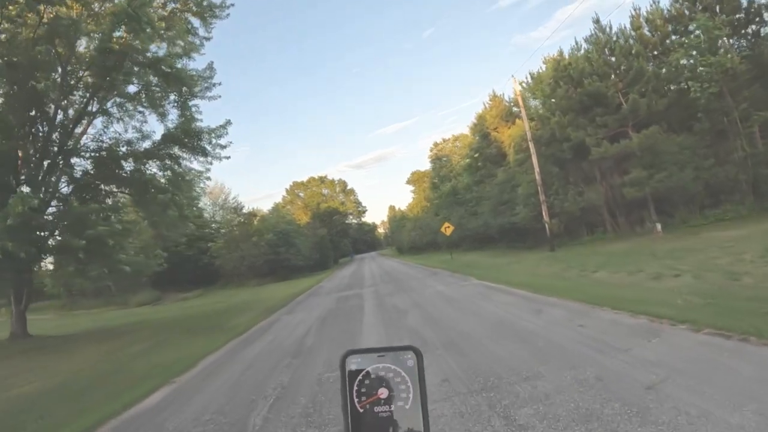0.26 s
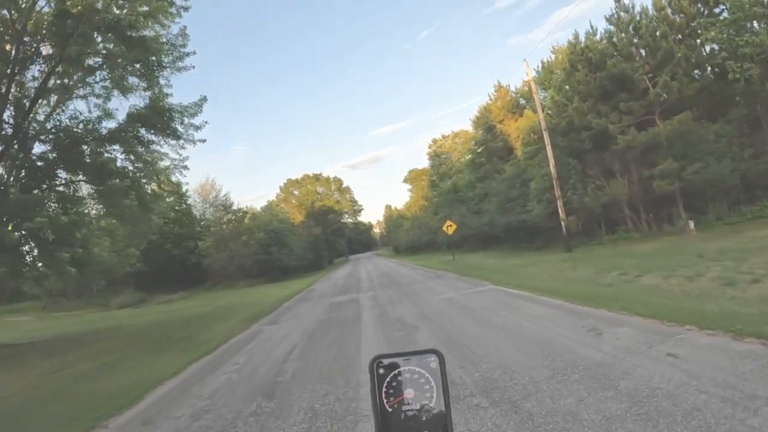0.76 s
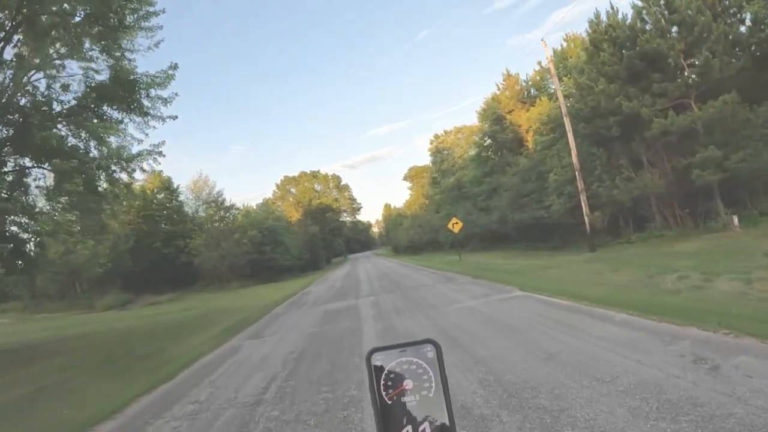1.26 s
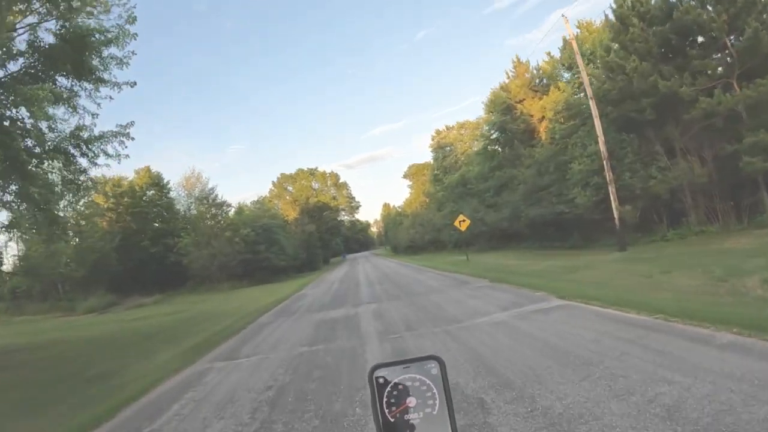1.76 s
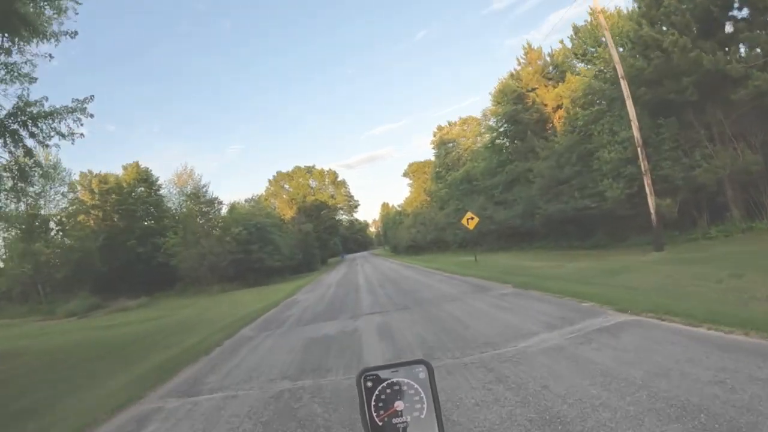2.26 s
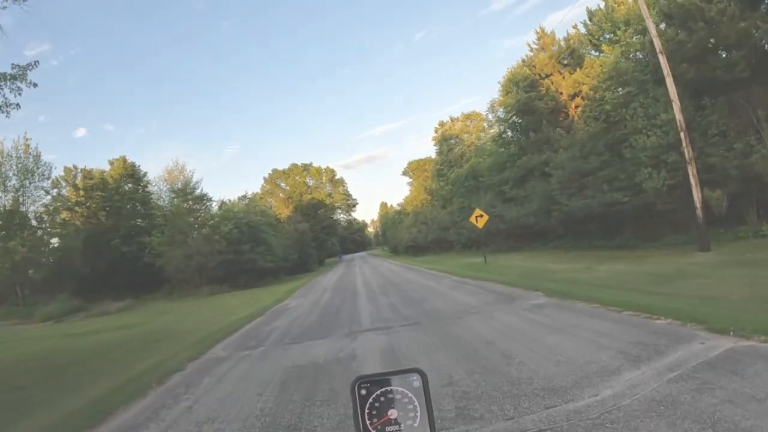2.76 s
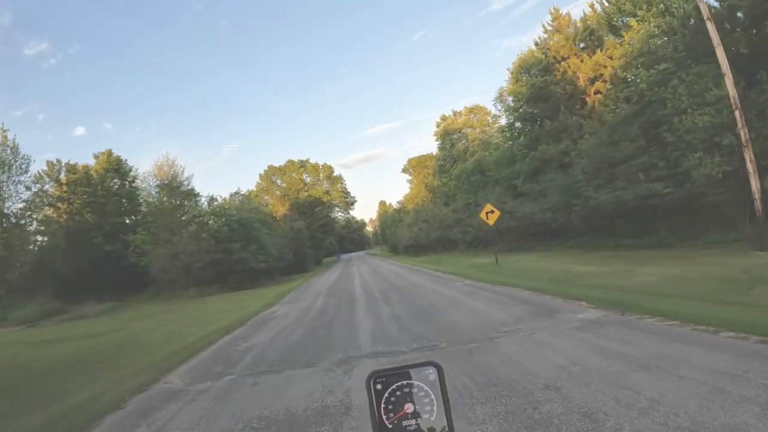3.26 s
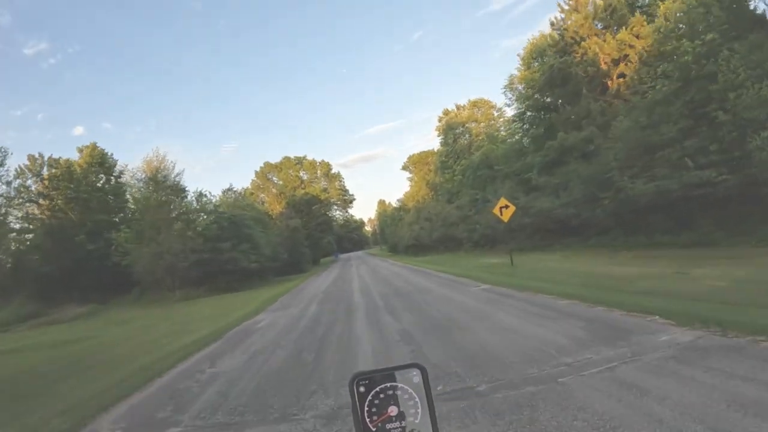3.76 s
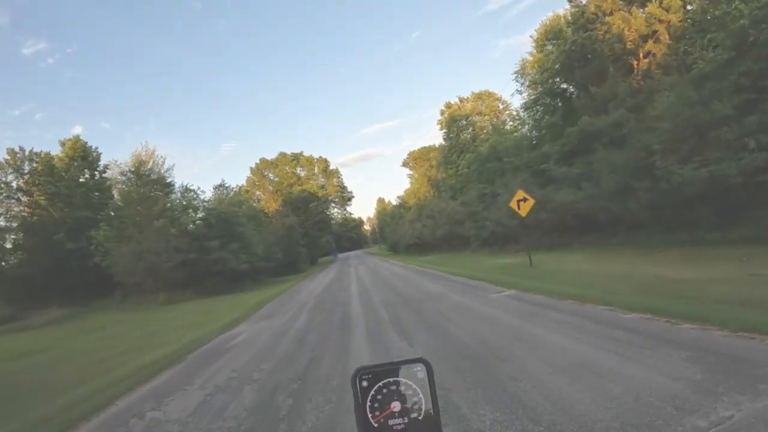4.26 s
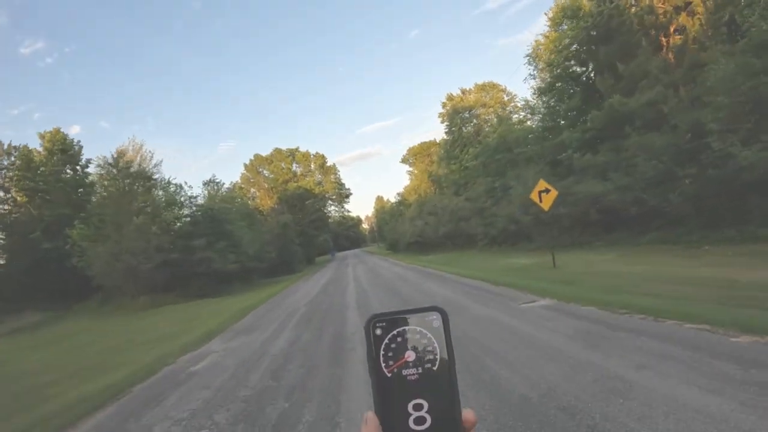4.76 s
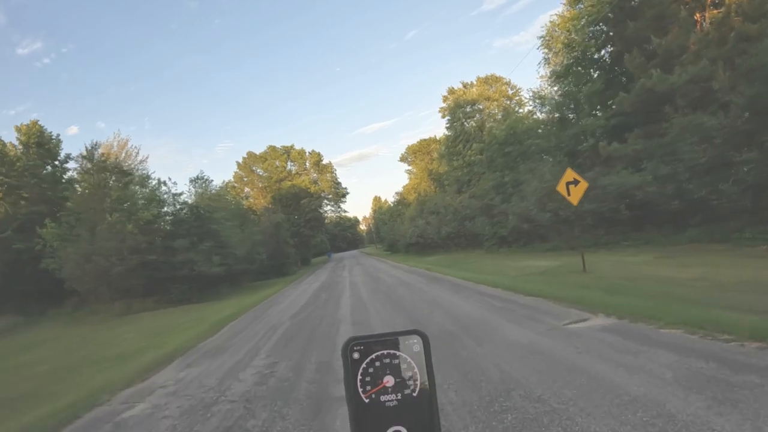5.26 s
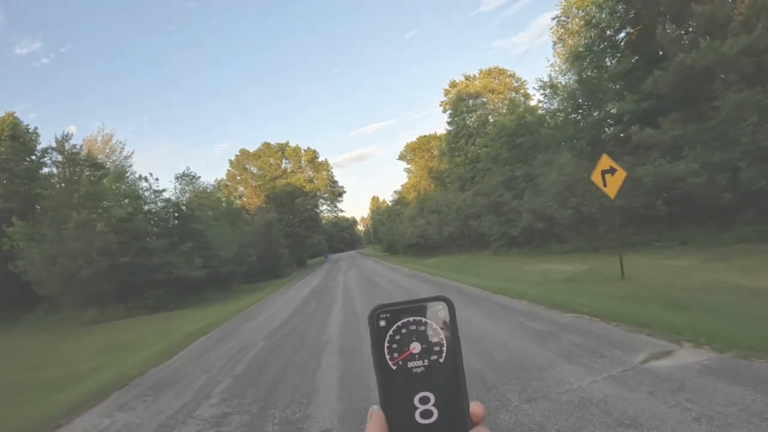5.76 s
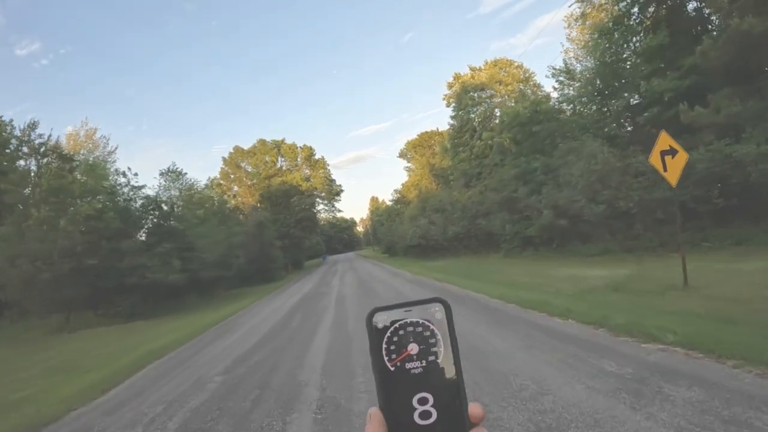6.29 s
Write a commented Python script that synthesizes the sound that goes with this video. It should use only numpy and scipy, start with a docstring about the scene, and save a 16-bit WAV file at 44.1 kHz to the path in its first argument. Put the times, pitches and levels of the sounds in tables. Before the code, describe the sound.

A small electric scooter's steady mid-pitched motor and chain whine over rumbling coarse asphalt, with cracks knocking and wind buffeting the microphone.

```python
"""Electric scooter, rider's place

Open country in the evening, microphone riding with the scooter along a paved road.
Close by, chain teeth meshing on the motor sprocket whine as sine lines, and roller ticks ring the frame.
Below, filtered noise makes the tyres roar on coarse asphalt; cracks knock as short falling tones.
Wind buffets the microphone as low noise in gusts; insects by the roadside are faint, narrow noise."""
import sys
import numpy as np
from scipy import signal
from scipy.fft import rfft, irfft
from scipy.io import wavfile
from scipy.ndimage import uniform_filter1d

SR = 44100
rng = np.random.default_rng(int(sys.argv[2]) if len(sys.argv) > 2 else 0)


def output_pcm(signal):
    """Save a mono or channel-first signal as 16-bit PCM at the path in sys.argv[1].

    Samples are clipped to [-1, 1] before scaling.
    """
    pcm = np.clip(np.atleast_2d(signal).T, -1, 1) * 32767
    wavfile.write(sys.argv[1], SR, np.round(pcm).astype(np.int16))


N = 287973
TIME = np.arange(N) / SR

# insects in the verge, loudest as the scooter passes them, before a 1 dB lift: (time [s], level [dB])
HISS_LEVEL = [(0, -85), (1.15, -77), (1.4, -69), (3.33, -68), (3.43, -74), (4.6, -75), (4.82, -70),
              (4.9, -86), (6.53, -88)]
# spectrum of those insects: (frequency [Hz], relative level per Hz [dB])
HISS_COLOUR = [(7000, -50), (9500, -23.5), (10500, -14.5), (11500, -10.5), (12300, -3.5), (13000, -1),
               (13900, -12.5), (15000, -16.5), (18000, -49)]

# steady airflow over the microphone: (time [s], level [dB])
AIRFLOW_LEVEL = [(0, -28.5), (.7, -25.5), (1.15, -32.5), (2.5, -40), (3.5, -29), (4.5, -27.5), (4.95, -33),
                 (5.2, -33), (5.4, -20.5), (5.6, -23), (5.8, -28), (6.1, -22.5), (6.53, -23)]
# gusts on top of it: (time of peak [s], length at half height [s], rumble level [dB], eddy level [dB])
GUSTS = [(0.103, 0.059, -29.5, -45.5), (0.38, .06, -26, -35), (0.554, .05, -20.5, -26.5),
         (0.675, 0.068, -19.5, -30.5), (0.908, .06, -19, -25), (2.175, 0.066, -27.5, -36.5),
         (2.938, .11, -29, -36.5), (3.496, .1, -29, -31.5), (3.773, 0.1, -22, -32.5),
         (4.07, .04, -27, -31.5), (4.212, .035, -28, -32), (4.678, .04, -25.5, -23.5),
         (4.818, 0.063, -15.5, -18.5), (5.068, .1, -27, -38.5), (5.258, .07, -25.5, -28),
         (5.483, .06, -28, -26.5), (5.578, .06, -25, -28.5), (5.66, .04, -20, -25),
         (5.894, .055, -19.5, -25), (6.004, .07, -19.5, -29), (6.135, .11, -16, -26),
         (6.273, .07, -19, -26), (6.372, 0.053, -17, -24)]
# spectrum of the wind rumble: (frequency [Hz], relative level per Hz [dB])
WIND_COLOUR = [(4, -11), (14, 0), (24, 5), (45, 4.5), (70, -1), (115, -9), (170, -16.5), (300, -34),
               (600, -33.5), (2000, -85)]
# spectrum of the small eddies that the gusts shed: (frequency [Hz], relative level per Hz [dB])
EDDY_COLOUR = [(40, -8.5), (125, 1.5), (220, -7.5), (400, -16), (900, -38.5), (2000, -83)]

# tyres on smoother and coarser asphalt: (time [s], level [dB])
ROAD_LEVEL = [(0, -34.5), (.3, -28), (.95, -30), (1.35, -27.5), (2.1, -28.5), (2.7, -31.5), (3.5, -28.5),
              (4.45, -27.5), (4.9, -30), (5.05, -28.5), (5.45, -28.5), (5.85, -28), (6.53, -29.5)]
# spectrum of the tyre roar: (frequency [Hz], relative level per Hz [dB])
ROAD_COLOUR = [(30, -6.5), (150, -14.5), (240, 2.5), (320, 0.5), (600, 3.5), (850, -21.5), (1000, -18.5),
               (1400, -11.5), (2200, -36.5), (6000, -71.5)]
# resonances of deck and tyre cavity: (frequency [Hz], width [Hz], relative level [dB])
DECK_MODES = [(357, 63.6, 7), (468, 33, 6), (528, 65, 5.5), (584, 91, 5), (717, 110, -16.5),
              (799.5, 32.3, 3)]
# cracks and stones in the road, levels ahead of the rubber's low-pass:
# (time [s], thud level [dB], clack level [dB], starting clack pitch [Hz])
BUMPS = [(0.245, -17.5, -27, 1100), (1.419, -16, -34, 900), (1.540, -15.5, -15.5, 1150),
         (1.773, -20, -34, 900), (2.200, -16, -36, 900), (2.310, -24, -38, 900), (2.501, -22, -36, 900),
         (3.453, -20, -30, 1000), (3.480, -21, -31, 1000), (3.848, -17.5, -20.5, 1450),
         (5.004, -22, -27, 1100), (5.070, -20.5, -31, 1000), (5.353, -21, -35, 900),
         (5.769, -23, -33, 1000), (6.104, -13.5, -16, 1400), (6.266, -26, -24.5, 1400)]
# steering column knocked by a crack: (frequency [Hz], width [Hz], relative level [dB])
COLUMN_MODES = [(863, 28, 3.5), (1110, 120, -4), (1310, 20, -3), (2510, 610, -6.5)]

# drive speed: (time [s], tooth meshing rate [Hz])
MESH_RATE = [(0.0, 390), (0.25, 405), (0.31, 394.4), (0.42, 398.4), (0.55, 395.3), (0.6, 388.5),
             (0.66, 394), (0.76, 398.4), (0.92, 396.4), (1.14, 401.5), (1.34, 393), (1.47, 397.8),
             (1.63, 397), (1.69, 391), (1.75, 399), (1.96, 401.6), (2.04, 407), (2.22, 404.4), (2.39, 395),
             (2.66, 403.8), (2.9, 406.5), (2.97, 403), (3.4, 401), (3.73, 404.1), (3.91, 398), (4.03, 406),
             (4.09, 398), (4.3, 403.4), (4.5, 405.4), (4.68, 402.5), (4.86, 396.5), (5.02, 402),
             (5.2, 394.2), (5.34, 393.5), (5.43, 399.7), (5.5, 412.8), (5.6, 418.8), (5.88, 400.6),
             (6.07, 401.6), (6.35, 407.6), (6.4, 400.2), (6.46, 411), (6.52, 408.5)]
# the wheel loses grip for a moment and the motor races:
# (time of peak [s], length at half height [s], rise of meshing rate [Hz])
SKIPS = [(3.824, .065, 15), (5.01, .055, 20)]
# how hard the chain rattles; the whine's overtones follow it: (time [s], level [dB])
CHAIN_LEVEL = [(0, -38.5), (.6, -40), (1.1, -41.5), (1.85, -43), (2.6, -43), (3.55, -42), (3.95, -40.7),
               (4.4, -41), (4.92, -42), (4.99, -40), (5.7, -40), (5.95, -41.5), (6.53, -40)]
# resonances of frame and chain guard: (frequency [Hz], width [Hz], relative level [dB])
FRAME_MODES = [(1246, 58, -6), (1542, 110, -2.5), (1842, 120, -10.5), (2335, 86, -1), (2540, 81, -5),
               (2834, 130, -4.5), (3010, 76, -15), (3553, 190, -6), (4080, 79, -16.5), (4500, 130, -11),
               (5355, 230, -27), (5217, 260, -19.5), (5980, 130, -28), (6510, 770, -23.5), (7750, 850, -40)]
# spectrum of the rollers' rubbing: (frequency [Hz], relative level per Hz [dB])
RATTLE_COLOUR = [(600, -22), (950, -4), (1400, 1), (2000, -4), (3000, -7), (4200, -14.5), (6000, -20.5),
                 (7900, -24), (8700, -36), (9600, -43), (10400, -32), (11500, -42.5), (13000, -66),
                 (16000, -68.5)]
# strength of the whine: (time [s], level [dB])
WHINE_LEVEL = [(0, -27.5), (.16, -19), (.32, -22.5), (.48, -18), (.59, -28), (.64, -20), (.75, -21),
               (.82, -17.5), (.91, -21), (1.02, -18), (1.07, -24), (1.2, -19), (1.42, -28.5), (1.5, -27.5),
               (1.63, -24.5), (1.7, -28.5), (1.84, -18), (2.11, -24), (2.33, -21), (2.42, -25), (2.53, -19),
               (2.63, -20), (2.75, -23.5), (2.98, -20.5), (3.11, -22.5), (3.42, -17), (3.47, -21),
               (3.78, -19), (3.88, -24.5), (4.07, -19.5), (4.73, -20.5), (4.95, -17), (5.02, -24),
               (5.13, -21.5), (5.2, -24), (5.28, -23.5), (5.35, -27), (5.43, -18), (5.48, -23.5),
               (6.07, -20), (6.13, -28), (6.17, -22), (6.53, -22)]
# the whine's octave re the chain level, before its trim: (time [s], level [dB])
OCTAVE_LEVEL = [(0, -1.5), (1.0, 4.5), (2.2, 3), (3.5, -2.5), (4.8, 0), (5.3, -2), (5.6, 6), (5.9, -2.5),
                (6.53, 1)]
# the whine's double octave re the chain level, before its trim: (time [s], level [dB])
DOUBLE_OCTAVE_LEVEL = [(0, -3.5), (.65, -2), (1.4, -5.5), (2.0, -5.5), (3.7, -5.5), (4.1, -6), (4.8, -4.5),
                       (5.33, -2), (5.9, -7.5), (6.53, -4)]
# a tone of the drive a fourth above the whine, re the chain level: (time [s], level [dB])
SIDE_TONE_LEVEL = [(0, 3.5), (.9, 4.5), (1.5, 0), (2.5, -4), (6.53, -2.5)]
# faint lines of the drive: (multiple of the meshing rate [ratio], level re the chain level [dB])
OVERTONES = [(5 / 6, -6), (7 / 6, -5), (1.5, 0.5), (2.09, -10), (8 / 3, -22), (3, -14.5), (3.83, -12),
             (4.15, -19), (14 / 3, -20), (20 / 3, -20)]

# after a crack the deck goes on shaking: extra drumming re the thud, and its decay time
SHAKE_DB, SHAKE_S = 11, .04
# deck thud and column clack: time to the peak of the envelope, and fall in pitch
THUD_HZ, THUD_S, THUD_SAG_OCT_PER_S = 660, .003, 18
CLACK_S, CLACK_SAG_OCT_PER_S = .0011, 60
# roar and rattle swell and ebb by these amounts once in so many teeth, first peaking at the time given
WHEEL_TEETH, FIRST_SWELL_S = 47, .035
ROAR_SWELL_DB, RATTLE_SWELL_DB = 1.13, 0.5
# the slack run of the chain flaps and shakes the timing of the teeth: rate, spread, depth in teeth
FLAP_HZ, FLAP_WIDTH_HZ, FLAP_TEETH = 66.5, 7, 0.0094
SIDE_TONE_RATIO = 4 / 3
STOPBAND_EDGE_HZ = 15700


def from_db(db):
    """Decibels to gain."""
    return 10 ** (np.asarray(db) / 20)


def rms_one(x):
    """Scale to unit power."""
    return x / np.sqrt(np.mean(x ** 2) + 1e-20)


def noise():
    """White noise over the whole scene."""
    return rng.standard_normal(N)


def in_time(rows):
    """One value per sample from a (time, value) curve, its corners rounded over 10 ms."""
    times, values = np.transpose(rows)
    return uniform_filter1d(np.interp(TIME, times, values), size=SR // 100)


def drift(rate_hz):
    """Slow random motion with spread 1: noise that falls away above rate_hz."""
    hz = np.arange(N // 2 + 1) * SR / N
    return rms_one(irfft(rfft(noise()) / (1 + (hz / rate_hz) ** 2), N))


def coloured(x, spectrum):
    """Give a sound a smooth spectrum, interpolated on a log frequency axis; rms 1."""
    hz, db = np.transpose(spectrum)
    bins = np.arange(N // 2 + 1) * SR / N
    gain = from_db(np.interp(np.log(bins + 1), np.log(hz), db))
    return rms_one(irfft(rfft(x) * gain, N))


def resonate(x, modes):
    """Parallel resonances, each passed twice for dark valleys between them."""
    out = np.zeros(N)
    for hz, width, db in modes:
        r = np.exp(-np.pi * width * np.pi / 2 / SR)  # widened by pi/2, as two passes narrow the peak
        section = [(1 - r * r) / 2, 0, (r * r - 1) / 2, 1, -2 * r * np.cos(2 * np.pi * hz / SR), r * r]
        out += from_db(db) * signal.sosfilt([section, section], x + 1e-18)
    return out


def swell(peak_time, length):
    """A rounded hump of height 1, centred on peak_time."""
    return 1 / (1 + (2 * (TIME - peak_time) / length) ** 4)


def knock(hz, peak_s, sag):
    """A few cycles in an envelope of height 1, peaking at peak_s, falling by sag octaves a second."""
    t = np.arange(SR // 20) / SR
    phase = 2 * np.pi * np.cumsum(hz * 2 ** (-sag * t)) / SR
    envelope = t / peak_s * np.exp(1 - t / peak_s)
    return envelope * np.sin(phase)


def levelled(x, window_s):
    """Hold a noise at unit power over a short window, leaving its faster lumps."""
    return x / np.sqrt(uniform_filter1d(x ** 2, size=int(window_s * SR)) + 1e-9)


def crickets(pitch_hz=2694, width_hz=14, level_db=-56):
    """Far tree crickets merge into one thin trill: noise through a narrow resonance."""
    return from_db(level_db) * rms_one(resonate(noise(), [(pitch_hz, width_hz, 0)]))


def hiss(hiss_db, flicker_db=1.0, lift_db=1.0):
    """Insects in the verge rasp faintly at the very top: flickering high noise."""
    flickering = noise() * from_db(flicker_db * drift(50))
    return from_db(hiss_db + lift_db) * coloured(flickering, HISS_COLOUR)


def wind(airflow_db, lumps_db=4.0, ceiling=0.3):
    """Gusts ride on the airflow and shed brighter eddies; both hit the microphone port in lumps."""
    gusts = sum(from_db(rumble_db) * swell(s, length) for s, length, rumble_db, _ in GUSTS)
    shedding = sum(from_db(eddy_db) * swell(s, length) for s, length, _, eddy_db in GUSTS)
    lumps = from_db(lumps_db * drift(24))
    rumble = levelled(coloured(noise() * lumps, WIND_COLOUR), window_s=.09)
    rumble *= np.hypot(from_db(airflow_db), gusts)
    eddies = shedding * levelled(coloured(noise() * lumps, EDDY_COLOUR), window_s=0.053)
    # the strongest lumps are rounded off
    return ceiling * np.tanh((rumble + eddies) / ceiling)


def tyres(road_db, grain_db=1.17, roar_db=-3.5):
    """Stones in the asphalt drum on the tyres and shake the deck, harder just after a crack."""
    shaking = np.zeros(N)
    for s, thud_db, _, _ in BUMPS:
        shaking += from_db(thud_db + SHAKE_DB) * (TIME > s) * np.exp(-abs(TIME - s) / SHAKE_S)
    texture = from_db(grain_db * drift(32)) * np.hypot(1, shaking)
    deck = rms_one(resonate(texture * noise(), DECK_MODES))
    roar = coloured(texture * noise(), ROAD_COLOUR)
    return from_db(road_db) * (deck + from_db(roar_db) * roar)


def bumps(column_db=28.5):
    """A crack thumps the deck and clacks the column, whose bending waves bring the highs first."""
    blows, clacks = np.zeros((2, N))
    for s, thud_db, clack_db, clack_hz in BUMPS:
        thud = from_db(thud_db) * knock(THUD_HZ, THUD_S, THUD_SAG_OCT_PER_S)
        clack = from_db(clack_db) * knock(clack_hz, CLACK_S, CLACK_SAG_OCT_PER_S)
        start = int(s * SR)
        blows[start:start + len(thud)] += thud + clack
        clacks[start] = from_db(clack_db)
    ringing = from_db(column_db) * resonate(clacks, COLUMN_MODES)
    rubber = signal.butter(4, 1650, fs=SR, output="sos")
    return signal.sosfilt(rubber, blows + ringing)


def rattle(meshes, rattle_db, uneven_db=9.0, clatter_db=1.25, ring_db=-1.0, tick_share=0.45):
    """Every roller lands with a tick of its own strength and rubs on its tooth; the frame rings."""
    # one landing per tooth, with a jittered moment
    lands = np.diff(np.floor(meshes + .15 * drift(200)), prepend=0) > 0
    ticks = rms_one(lands * noise() * from_db(uneven_db * np.tanh(drift(66))))
    force = (tick_share * ticks + noise()) * from_db(clatter_db * drift(32))
    ringing = from_db(ring_db) * rms_one(resonate(force, FRAME_MODES))
    friction = noise() * from_db(clatter_db * drift(70))
    rubbing = coloured(friction + 0.12 * ticks, RATTLE_COLOUR)
    return from_db(rattle_db) * (ringing + rubbing)


def whine(meshes, chain_db, octave_trim_db=-1.0, double_trim_db=-0.35, waver_db=0.64, wander_rad=0.59):
    """Each tooth that engages pushes once: a strong line, its octaves, and faint lines of the drive."""
    flap = rms_one(resonate(noise(), [(FLAP_HZ, FLAP_WIDTH_HZ, 0)]))
    angle = 2 * np.pi * (meshes + FLAP_TEETH * flap) + 0.038 * drift(7.4)

    def line(multiple, db, flutter, wander=0, wander_hz=3.7):
        """One multiple of the meshing rate, fluttering with the chain's tension."""
        phase = multiple * angle + rng.uniform(0, 2 * np.pi) + wander * drift(wander_hz)
        return np.sqrt(2) * from_db(db) * np.sin(phase) * (1 + flutter * drift(20))

    octave_db = chain_db + in_time(OCTAVE_LEVEL) + octave_trim_db
    double_db = chain_db + in_time(DOUBLE_OCTAVE_LEVEL) + double_trim_db
    side_db = chain_db + in_time(SIDE_TONE_LEVEL)
    tone = line(1, in_time(WHINE_LEVEL) + waver_db * drift(18), flutter=0.11)
    tone += line(2, octave_db, flutter=0.54, wander=0.5, wander_hz=13)
    tone += line(4, double_db, flutter=0.1, wander=0.7, wander_hz=3.5)
    tone += line(SIDE_TONE_RATIO, side_db, flutter=0.4, wander=0.45, wander_hz=8.7)
    for multiple, db in OVERTONES:
        tone += line(multiple, chain_db + db, flutter=0.22, wander=wander_rad)
    return tone


def scene():
    """Insects, wind, road and drive in the open air; one meshing count times the whole drive."""
    mesh_hz = in_time(MESH_RATE) + sum(rise * swell(s, length) for s, length, rise in SKIPS)
    meshes = np.cumsum(mesh_hz) / SR
    first_swell = np.interp(FIRST_SWELL_S, TIME, meshes)
    wheel = np.cos(2 * np.pi * (meshes - first_swell) / WHEEL_TEETH)
    chain_db = in_time(CHAIN_LEVEL)
    insects = crickets() + hiss(in_time(HISS_LEVEL))
    air = wind(in_time(AIRFLOW_LEVEL))
    road = tyres(in_time(ROAD_LEVEL) + ROAR_SWELL_DB * wheel) + bumps()
    drive = rattle(meshes, chain_db + RATTLE_SWELL_DB * wheel) + whine(meshes, chain_db)
    return (insects + air + road + drive)[None]


def record(dry):
    """The top is cut steeply, 70 dB down from the stopband edge upwards."""
    steep_cut = signal.cheby2(12, 70, STOPBAND_EDGE_HZ, fs=SR, output="sos")
    return signal.sosfilt(steep_cut, dry)


dry = scene()
out = record(dry)
output_pcm(out)
```